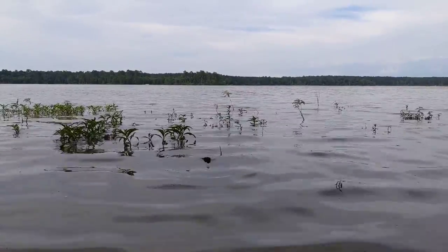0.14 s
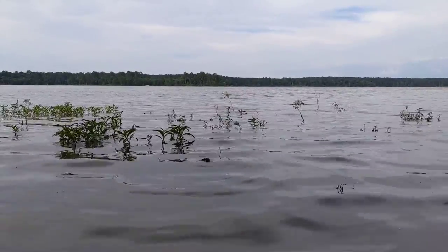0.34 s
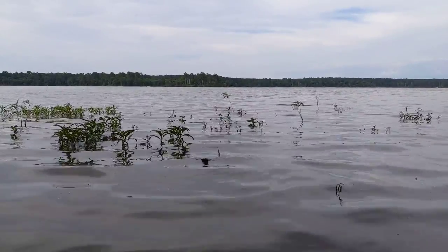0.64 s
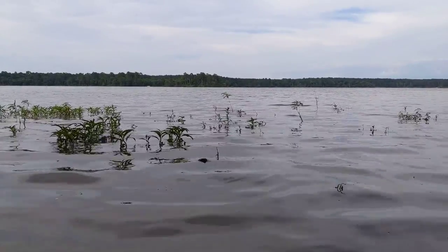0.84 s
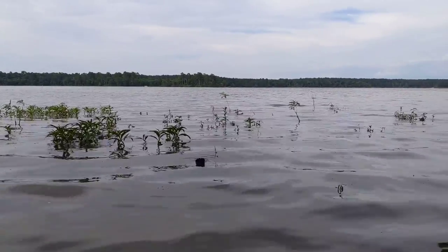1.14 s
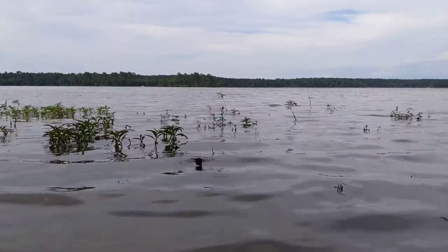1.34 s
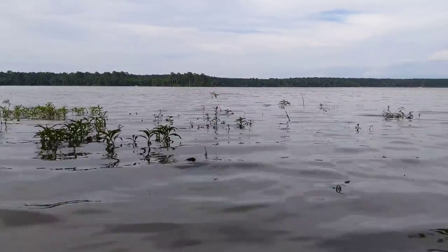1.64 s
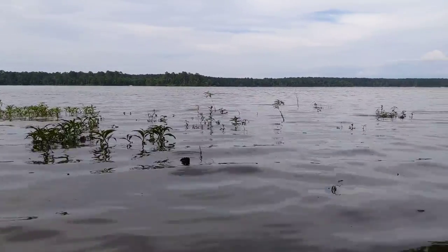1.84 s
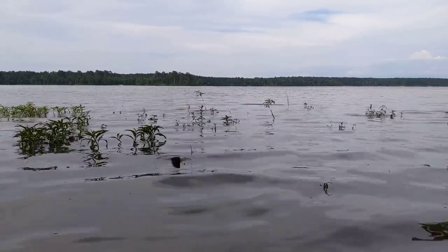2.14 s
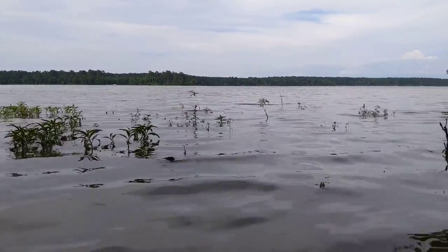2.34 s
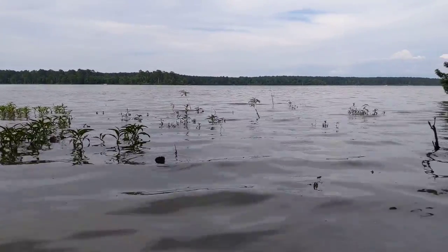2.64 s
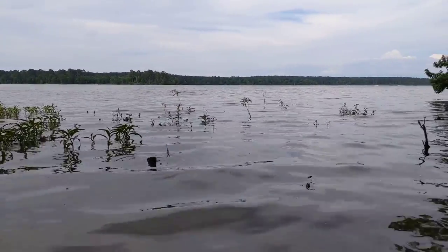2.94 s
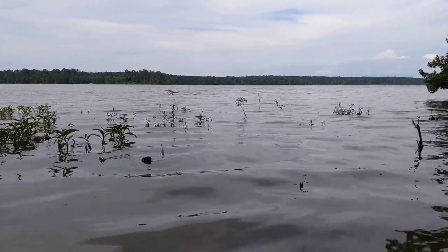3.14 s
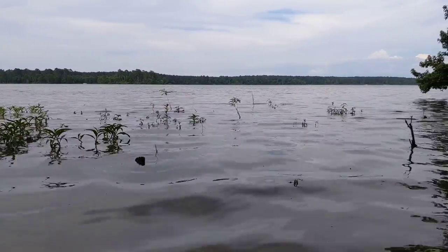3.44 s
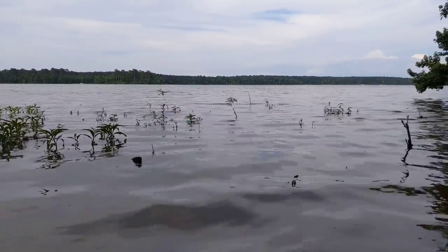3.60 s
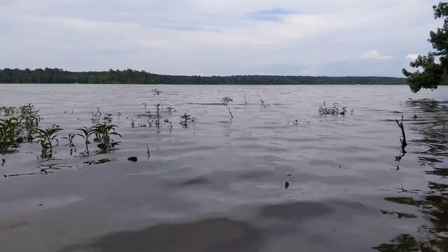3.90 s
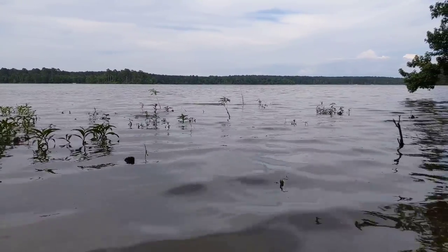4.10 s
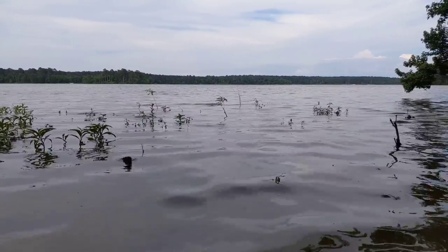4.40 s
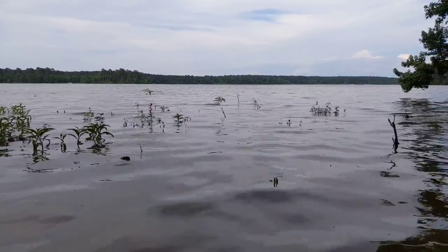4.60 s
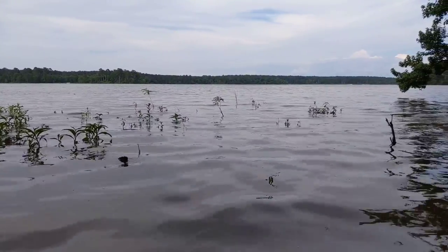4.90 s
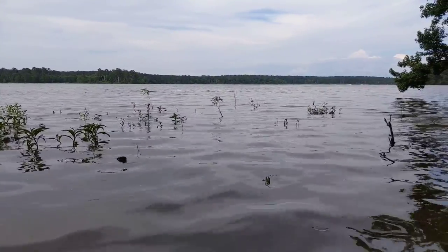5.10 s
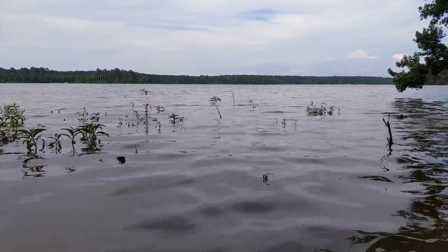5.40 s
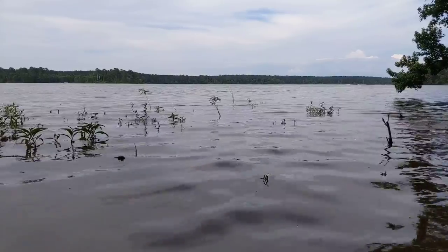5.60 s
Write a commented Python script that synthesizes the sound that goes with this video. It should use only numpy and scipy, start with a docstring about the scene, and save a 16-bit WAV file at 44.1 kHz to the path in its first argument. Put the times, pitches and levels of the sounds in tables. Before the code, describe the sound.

Outdoor mono sound, microphone low and near the water, unshielded from wind. Gentle bubbling at first, a brighter slosh at about 1.7 to 2 seconds, a lull, then small scattered laps and heavy dull wind knocks from nearly three seconds on. The water grows busier near five seconds and ends on its strongest hissy lap. Behind it, a far boat engine wavers and slowly rises in pitch under faint insect buzz.

```python
"""A lake shore, one microphone port close to small waves that lap among flooded plants.
The water is patchy noise for wash, hiss and spray, with damped sines for bubbles and cracks for drops;
some of the hiss is wind. Wind also rumbles and flutters on the port; eddies thump it with a slowing swing.
Far off, a boat motor hums as three orders of one shaft, rising slowly in pitch, beside a fainter low hum.
Insects sing in the trees as narrow pulsing noise, over an even hiss of far water and leaves."""
import sys
import numpy as np
from scipy import signal
from scipy.fft import rfft, irfft, next_fast_len
from scipy.io import wavfile
from scipy.ndimage import uniform_filter1d, map_coordinates

SR = 44100
rng = np.random.default_rng(int(sys.argv[2]) if len(sys.argv) > 2 else 0)


def output_pcm(signal):
    """Save a mono or channel-first signal as 16-bit PCM at the path in sys.argv[1].

    Samples are clipped to [-1, 1] before scaling.
    """
    pcm = np.clip(np.atleast_2d(signal).T, -1, 1) * 32767
    wavfile.write(sys.argv[1], SR, np.round(pcm).astype(np.int16))


N = 253575  # samples


def amp(db):
    """Amplitude of a level in dB."""
    return 10 ** (np.asarray(db) / 20)


def unit(x):
    """x scaled to an rms of 1."""
    return x / np.sqrt(np.mean(x ** 2) + 1e-20)


def curves(rows):
    """One value per sample for each column after the time."""
    s, *columns = np.transpose(rows)
    return [np.interp(np.arange(N) / SR, s, column) for column in columns]


def wobble(rate):
    """A smooth random curve, rate knots a second."""
    knots = rng.standard_normal(int(N * rate / SR) + 4)
    return map_coordinates(knots, [np.arange(N) * rate / SR])


def filtered(x, response):
    """x with its spectrum multiplied by a response of frequency."""
    m = next_fast_len(N + SR // 2)
    spectrum = rfft(x, m) * response(np.fft.rfftfreq(m, 1 / SR))
    return irfft(spectrum, m)[..., :N]


def rush(spectrum, patchy_db):
    """Coloured noise of rms 1, with random gain in patches of time and frequency."""
    z = signal.stft(rng.standard_normal(N), nperseg=512)[2]
    field = uniform_filter1d(rng.standard_normal(z.shape), size=5, axis=0)
    field = uniform_filter1d(field, size=5, axis=1)
    x = signal.istft(z * amp(patchy_db * unit(field)), nperseg=512)[1][:N]
    f, db = np.transpose(spectrum)
    return unit(filtered(x, lambda hz: amp(np.interp(np.log(hz + 1), np.log(f + 1), db))))


def grains(s, db, hz, cycles, rise, length=1600):
    """Damped sines with a quick start; the pitch climbs by the share rise over the life of each."""
    t = np.arange(length) / SR
    u = t * (hz / np.maximum(cycles, .3))[:, None]  # time in lives
    shape = 2.05 * (1 - np.exp(-14 * u)) * np.exp(-2.5 * u)
    turns = hz[:, None] * t * (1 + np.reshape(rise, (-1, 1)) * (np.minimum(u, 2) - .6) / 2)
    wave = amp(db)[:, None] * shape * np.sin(2 * np.pi * turns)
    at = np.round(s * SR).astype(int)[:, None] + np.arange(length)
    return np.bincount(at.ravel(), wave.ravel(), N + length)[:N]


def swarm(level_db, low_hz, high_hz, cycles, spread_db, count, length, rise):
    """Chance grains that follow the given level at their moment; a few stand far out."""
    u = rng.random((count, 4))
    s = u[:, 0] * (N - 1) / SR
    db = level_db[(s * SR).astype(int)] - spread_db * np.log(u[:, 1] + 0.01)
    hz = low_hz * (high_hz / low_hz) ** u[:, 2]
    return grains(s, db, hz, cycles * (.5 + u[:, 3]), rise=rise, length=length)


# colour of the far water and leaves: freq_hz, gain_db (relative)
AIR_SPECTRUM = [(150, -120), (250, 4), (500, -4.5), (1000, -29), (2000, -21), (5000, -19.5), (6500, -22.5),
                (12000, -24), (16000, -29), (17000, -120)]
# bands of the insect song: centre_hz, width_hz, gain_db (relative)
INSECT_BANDS = [(9136, 540, -6.5), (9140, 30, -1), (8780, 62, -8.5)]


def shore():
    """Far water and leaves hiss evenly; insects buzz in a narrow band, pulsing 65 times a second."""
    def song(f):
        return sum(amp(db) / (1 + (2 * (f - c) / w) ** 4) for c, w, db in INSECT_BANDS)

    pulse = 1 + 0.25 * np.sin(2 * np.pi * 65 * np.arange(N) / SR)
    insects = unit(filtered(rng.standard_normal(N), song)) * pulse
    air = amp(-71.5) * rush(AIR_SPECTRUM, patchy_db=0)
    return air + amp(-82.0 + 2.3 * wobble(0.7)) * insects


# strength of the low hum, before its random wavering: time_s, level_db
LOW_HUM_LEVEL = [(0, -74), (1.5, -75), (5.75, -85.5)]


def low_hum():
    """A second, fainter hum wavers around 195 Hz and fades away."""
    phase = 2 * np.pi * 195 * np.arange(N) / SR + 1.4 * wobble(8.1)
    level_db = curves(LOW_HUM_LEVEL)[0] + 4 * wobble(12)
    return amp(level_db) * np.sqrt(2) * np.sin(phase)


# strength of the far motor, before its fades: time_s, level_db
MOTOR_LEVEL = [(0, -65), (.5, -54), (.8, -66), (.95, -63.5), (1.3, -58), (1.8, -64), (2.5, -69), (3, -61.5),
               (3.6, -65), (4.4, -60), (5.75, -56)]
# pitch of the sixth order of the shaft: time_s, pitch_hz
SIXTH_ORDER_PITCH = [(0, 347), (1.1, 350), (1.45, 363), (1.8, 368), (2.6, 370), (3, 373.5), (4.5, 374.5),
                     (5.75, 378.5)]
# orders that carry to the microphone: shaft_multiple, gain_db (relative)
MOTOR_ORDERS = [(5, -20.5), (6, 0.5), (7, -20.5)]
SCATTER = .75  # scattered over direct sound on the way across the water


def motor():
    """A far engine carries over the water, its sixth order strongest; scattered sound beats with it in fades."""
    shaft = 2 * np.pi * np.cumsum(curves(SIXTH_ORDER_PITCH)[0]) / SR / 6
    paths = 1 + SCATTER * (wobble(20) + 1j * wobble(20))  # direct plus scattered
    orders = sum(amp(db) * np.exp(1j * (order * shaft + .3 * wobble(21))) for order, db in MOTOR_ORDERS)
    return amp(curves(MOTOR_LEVEL)[0]) * np.imag(paths * orders) / np.sqrt(.5 + SCATTER ** 2)


# slow strength of the wind on the port: time_s, rumble_db, flutter_db
WIND_LEVELS = [(0, -50.5, -65), (.5, -51, -61), (1, -48, -60.5), (1.5, -54, -53), (1.75, -51.5, -55),
               (2.05, -50, -55.5), (2.3, -47, -65.5), (2.7, -47.5, -64), (2.8, -55, -60), (2.95, -47, -59),
               (3.15, -47.5, -50), (3.4, -50.5, -64.5), (3.56, -56, -65), (3.75, -44, -57),
               (3.93, -57.5, -62), (4.05, -45.5, -51), (4.32, -52, -60), (4.55, -51.5, -54),
               (4.9, -48, -60), (5.2, -47.5, -54), (5.45, -43.5, -48), (5.75, -43, -44)]
# eddies that thump the port, also played by eddies(): start_s, level_db, length_s
PORT_EDDIES = [(2.02, -38, 0.017), (2.849, -32.5, 0.023), (2.877, -24.5, 0.019), (2.896, -28, 0.019),
               (2.919, -59, 0.032), (2.97, -28, 0.014), (3.075, -44, 0.017), (3.115, -38.5, 0.028),
               (3.179, -41, 0.021), (3.309, -35, 0.009), (3.752, -33, 0.021), (4.119, -42.5, 0.022),
               (4.224, -24, 0.022), (4.242, -36, 0.011), (4.395, -26, 0.02), (4.434, -37.5, 0.035),
               (4.699, -41, 0.021), (4.801, -49, 0.024), (4.953, -40.5, 0.017), (5.043, -43, 0.034),
               (5.101, -32, 0.0285), (5.318, -36, 0.022), (5.337, -32, .022), (5.428, -38, 0.015),
               (5.481, -40.5, 0.034), (5.525, -33.5, 0.027), (5.545, -28.5, 0.0261), (5.57, -34, .03),
               (5.589, -38, .046), (5.649, -40.5, 0.043), (5.709, -40, 0.02)]
# colour of the rumble: freq_hz, gain_db (relative)
RUMBLE_SPECTRUM = [(8.8, -33), (15, -3.5), (39, -4), (76, -15.5), (104, -27), (130, -20.5), (170, -32),
                   (290, -120)]
# colour of the flutter and of the air behind an eddy: freq_hz, gain_db (relative)
FLUTTER_SPECTRUM = [(50, -120), (70, 8.5), (150, -2.5), (220, -11.5), (330, -13), (500, -27), (700, -120)]
LUMPS_DB = 4  # chance lumps of the rumble
SHOVE_DB, SHOVE_S = -14, 0.03  # rumble relative to an eddy's level, and its spread in time


def wind():
    """Lumpy rumble and flutter on the port; every eddy also shoves the rumble up for a moment."""
    rumble_db, flutter_db = curves(WIND_LEVELS)
    t = np.arange(N) / SR
    shoves = sum(amp(db + SHOVE_DB) * np.exp(-((t - s - length) / SHOVE_S) ** 2)
                 for s, db, length in PORT_EDDIES)
    rumble_gain = amp(rumble_db + LUMPS_DB * wobble(12)) + shoves
    rumble = rumble_gain * rush(RUMBLE_SPECTRUM, patchy_db=0.5)
    lumps = amp(2 * wobble(30) + 2.5 * wobble(10))
    return rumble + amp(flutter_db) * unit(lumps * rush(FLUTTER_SPECTRUM, patchy_db=3))


EDDY_HZ = 200.4  # reference pitch: the swing starts at 1.084 of it and slows towards 0.518


def eddies():
    """Each eddy swings the diaphragm a few times, slowing as it passes, with ragged air behind it."""
    out, t = np.zeros(N + SR), np.arange(SR // 4) / SR
    ragged = np.pad(rush(FLUTTER_SPECTRUM, patchy_db=5.5), (0, SR))
    for s, db, length in PORT_EDDIES:
        u, at = t / max(length, .005), round(s * SR)  # time in eddy lengths, first sample
        turns = np.cumsum(EDDY_HZ * (0.518 + 0.566 * np.exp(-1.2 * u))) / SR
        envelope = (np.e * 1.45 * u * np.exp(-2.2 * u)) ** 0.92
        swing = envelope * np.sin(2 * np.pi * (turns + rng.random()))
        wake = 0.66 * u * np.exp(-1.1 * u) * ragged[at:at + len(t)]
        out[at:at + len(t)] += amp(db) * (swing + wake)
    return out[:N]


# drops on leaves and water: start_s, level_db, pitch_hz (of the ring), depth_db (low part, relative)
DROP_TICKS = [(0.2253, -60, 5620, -4), (0.2735, -54.5, 8500, -23), (.4457, -44.5, 5100, -3),
              (0.8983, -53.5, 7570, -9.5), (1.2947, -66, 4940, 8), (1.3313, -54, 8400, 2),
              (1.6058, -57, 13200, -18), (1.614, -58.5, 6760, -6), (1.6228, -55, 9100, -17),
              (1.651, -52.5, 6120, -7), (1.663, -63, 9070, 7.5), (1.776, -58, 9200, -16),
              (1.804, -53, 7100, -13), (1.8226, -52, 12300, -5), (1.839, -56, 7330, -12),
              (1.874, -61, 12600, -13), (1.8974, -52.5, 9050, -17), (1.9011, -55, 7240, -16),
              (1.924, -52, 7090, -19), (1.9318, -64, 7050, 12), (2.6069, -61, 9050, -23),
              (2.8005, -57.5, 9000, -8), (3.014, -59, 5550, -12), (3.1928, -61, 9210, -12),
              (4.4226, -57, 9400, -20), (4.6729, -46.5, 9600, -42), (4.721, -68, 9260, -2),
              (4.8755, -61, 9370, -16.5), (4.914, -55, 7410, -17), (4.9322, -56, 5680, -6),
              (4.969, -61, 6000, -4), (5.0219, -64, 6150, 3), (5.056, -53, 11200, 2),
              (5.0836, -62, 6510, -5), (5.1615, -63, 5500, -1), (5.2474, -54, 5200, -18),
              (5.6735, -71, 5500, -4), (5.7198, -48.5, 10700, -10), (5.7288, -41, 13600, -16)]
TICK_RING_S = 0.00064  # life of the bright ring


def ticks():
    """A drop lands as a broad crack and a short bright ring; heavier drops reach lower as well."""
    s, db, hz, depth_db = np.transpose(DROP_TICKS)
    same = np.ones_like(s)  # one setting for every drop
    ring = grains(s, db + 2.0, hz, hz * TICK_RING_S, rise=0, length=200)
    crack = sum(grains(s, db - 5.0, high_hz * same, 1.1 * same, rise=0, length=200)
                for high_hz in (6500, 9500, 13500))
    deep = sum(grains(s, db + depth_db + 9.5, low_hz * same, 0.3 * same, rise=0, length=200)
               for low_hz in (1100, 2300, 4000))
    return ring + crack + deep


# swells of gurgle, hiss and spray: laps of waves, and some wind hiss that comes with the eddies;
# levels before the layer trims in water(): crest_s, hold_s, gurgle_db, hiss_db, spray_db
SWELLS = [(0.55, 0.028, -71, -74, -89), (0.634, 0.12, -69.5, -80, -98), (1.003, 0.017, -74, -92, -101),
          (1.137, 0.22, -70, -76, -95), (1.31, 0.18, -73.5, -98, -98), (1.648, 0.03, -65, -71.5, -74.5),
          (1.749, .12, -63.5, -69.5, -75.5), (1.921, 0.017, -60, -67.5, -74.5),
          (1.98, 0.062, -64.5, -70, -94), (2.164, .01, -72.5, -90, -92), (2.714, 0.017, -70.5, -81, -80),
          (2.865, 0.19, -64, -67.5, -80.5), (3.16, 0.035, -76.5, -78, -85),
          (3.328, 0.036, -73.5, -72, -84.5), (3.533, 0.0091, -70.5, -83, -82), (3.7, 0.018, -73, -80, -95),
          (3.766, 0.025, -67.5, -69, -96), (3.86, 0.12, -78, -76.5, -91), (4.11, 0.034, -70.5, -74.5, -95),
          (4.24, 0.028, -69.5, -72, -95), (4.412, 0.064, -74, -73, -99), (4.71, 0.022, -73.5, -73.5, -95),
          (4.795, 0.047, -73, -78, -97), (4.863, 0.04, -64.5, -78, -79),
          (4.952, 0.045, -59.5, -65.5, -77.5), (5.032, 0.12, -58, -62.5, -79), (5.197, .02, -62, -71, -84),
          (5.324, 0.024, -66, -66, -83), (5.443, 0.21, -70, -70.5, -85), (5.667, .03, -59.5, -70, -94),
          (5.737, .05, -56, -55, -68)]
# calm between the swells, one value each: gurgle_db, hiss_db, spray_db
CALM_LEVELS = [-78, -80, -95.5]
RISE_DB_PER_S, FALL_DB_PER_S = 261, 151


def swells():
    """Gurgle, hiss and spray in dB: each swell rises fast to its crest, holds, and falls back to the calm."""
    t = np.arange(N) / SR
    power = amp(CALM_LEVELS)[:, None] ** 2
    for s, hold, *db in SWELLS:
        rise_db = RISE_DB_PER_S * np.maximum(s - t, 0)
        fall_db = FALL_DB_PER_S * np.maximum(t - s - hold, 0)
        power = power + amp(db)[:, None] ** 2 * amp(-2 * (rise_db + fall_db))
    return 10 * np.log10(power)


# colours of the three noise layers: freq_hz, gain_db (relative)
WASH_SPECTRUM = [(300, -120), (430, -10), (700, 1.5), (1300, -1), (2000, -3), (2800, -30), (4000, -120)]
HISS_SPECTRUM = [(900, -120), (1500, -22), (2500, -1.5), (4000, 1), (5200, -3.5), (5900, -11), (8000, -120)]
SPRAY_SPECTRUM = [(3000, -120), (5000, 5), (8000, 0), (12000, 0), (16000, -6), (17000, -120)]
# the clearest bubbles: start_s, level_db, pitch_hz, life_cycles
CLEAR_BUBBLES = [(.133, -62.5, 2130, 12), (.314, -61.5, 3750, 17), (.46, -60.5, 3170, 20),
                 (.461, -62, 1126, 29), (.57, -63, 3980, 36), (.623, -65, 1110, 21), (.644, -63, 1520, 19),
                 (.661, -45, 2320, 8.7), (.684, -68, 1160, 19), (.771, -64, 1220, 12), (.891, -68, 816, 28),
                 (.913, -59, 4180, 22), (1.009, -63.5, 1184, 17), (1.066, -61, 1380, 14),
                 (1.079, -62, 2200, 16), (1.13, -60.5, 1460, 11), (1.143, -66.5, 1246, 44),
                 (1.16, -65, 2210, 23), (1.204, -61.5, 1760, 29), (1.225, -66, 1150, 22),
                 (1.255, -63, 1860, 25), (1.297, -54.5, 1140, 8.7), (1.332, -54.5, 1880, 12),
                 (1.385, -61, 745, 12), (1.472, -62.5, 820, 12), (1.504, -62, 1120, 13),
                 (1.613, -62, 1550, 16), (1.641, -59, 654, 8.7), (1.648, -53, 433, 8),
                 (1.664, -55, 685, 5.9), (1.681, -50, 2090, 10.5), (1.87, -59, 1530, 11),
                 (1.936, -41.5, 1510, 8.7), (2.036, -57.5, 4180, 35), (2.037, -60, 2230, 24),
                 (2.049, -51.5, 1060, 4.6), (2.073, -59.5, 2620, 27), (2.738, -57, 870, 7.6),
                 (2.74, -53, 1640, 14), (2.964, -55, 925, 12), (3.054, -58.5, 2880, 22),
                 (3.06, -53, 614, 9), (3.069, -59.5, 1050, 15), (3.332, -63, 895, 7.3),
                 (3.361, -62, 1760, 20), (3.377, -65.5, 1386, 35), (3.557, -59, 1060, 9.3),
                 (3.694, -58.5, 1900, 12), (3.703, -61.5, 1190, 12), (3.758, -57.5, 770, 6.6),
                 (3.759, -62.5, 1840, 16), (3.93, -59, 2380, 18), (3.944, -60.5, 3600, 14),
                 (4.124, -59, 610, 12), (4.265, -60, 1060, 11), (4.278, -61, 800, 12),
                 (4.595, -62, 1740, 16), (4.721, -63, 870, 16), (4.921, -60, 1690, 36),
                 (4.954, -52, 1260, 21), (4.97, -55.5, 4700, 25), (4.993, -53.5, 1320, 23),
                 (5.029, -57, 738, 8.1), (5.037, -58, 4600, 41), (5.056, -51.5, 3930, 14),
                 (5.106, -59, 1220, 10), (5.117, -57, 1790, 19), (5.155, -52.5, 1920, 23),
                 (5.223, -51.5, 530, 9.2), (5.334, -59, 1310, 14), (5.603, -54.5, 1266, 18),
                 (5.642, -58, 1490, 21), (5.663, -50.5, 984, 13), (5.679, -54.5, 850, 12),
                 (5.705, -69, 1980, 12), (5.716, -53, 2520, 36)]
BUBBLE_CLIMB = 0.06  # share by which the pitch climbs over a life


def water():
    """Wash, hiss (some of it wind) and spray are thin noise under swarms of small bubbles and droplets."""
    wash_db, hiss_db, spray_db = swells()
    slosh = wobble(45)  # one random curve moves all three layers at once
    wash_db = wash_db + 1.4 * slosh
    hiss_db = hiss_db + 1.2 * slosh
    spray_db = spray_db + 1.5 * slosh
    wash = amp(wash_db - 7) * rush(WASH_SPECTRUM, patchy_db=2)
    hiss = amp(hiss_db - 4) * rush(HISS_SPECTRUM, patchy_db=1.5)
    spray = amp(spray_db + 2.5 + 3.9 * wobble(150)) * rush(SPRAY_SPECTRUM, patchy_db=5)
    gurgle = swarm(wash_db - 6.5, 488.0, 2590, cycles=7.47, spread_db=2.0,
                   count=3000, length=1000, rise=0.33)
    froth = swarm(hiss_db - 7.5, 2180, 5250, cycles=11.1, spread_db=4,
                  count=3000, length=400, rise=0.14)
    droplets = swarm(spray_db + 6.5, 7400, 11600, cycles=3.9, spread_db=4.5,
                     count=1400, length=60, rise=0)
    pings = swarm(wash_db - 4, 847, 2796, cycles=16.2, spread_db=2.0,
                  count=600, length=1600, rise=.2)
    bubbles = grains(*np.transpose(CLEAR_BUBBLES), rise=BUBBLE_CLIMB)
    return wash + hiss + spray + pings + gurgle + froth + droplets + bubbles


def scene():
    """All sources from the far shore to the near water, summed at the one port."""
    return (shore() + low_hum() + motor() + wind() + eddies() + ticks() + water())[None]


TOP_HZ = 15800  # band limit


def record(dry):
    """The recorder keeps nothing at or above its band limit."""
    return filtered(dry, lambda hz: hz < TOP_HZ)


dry = scene()
out = record(dry)
output_pcm(out)
```